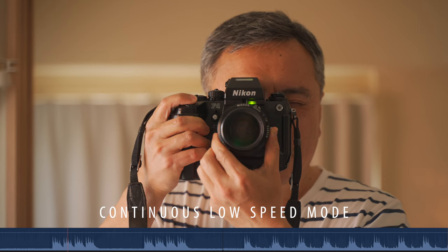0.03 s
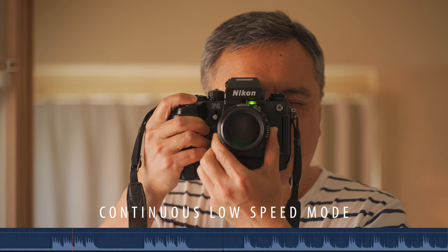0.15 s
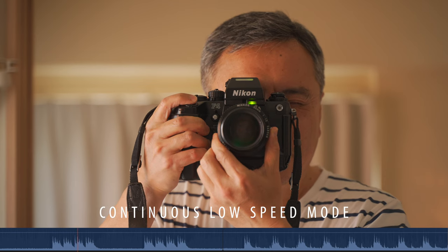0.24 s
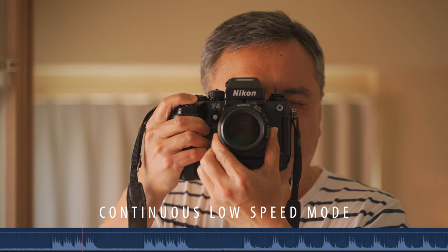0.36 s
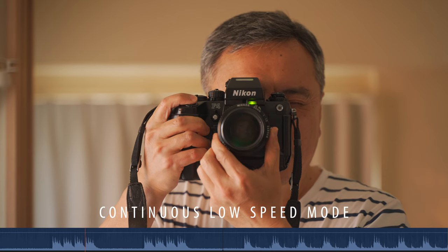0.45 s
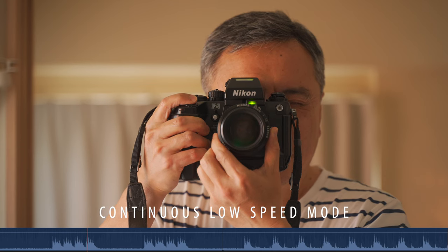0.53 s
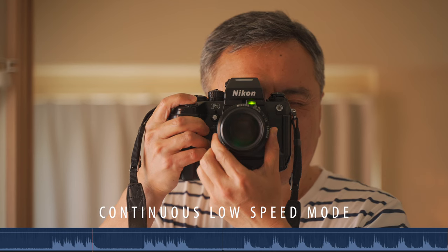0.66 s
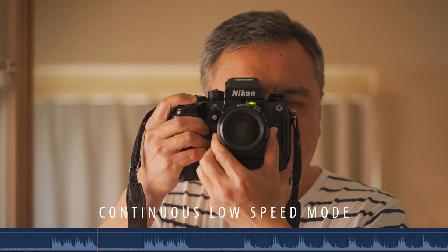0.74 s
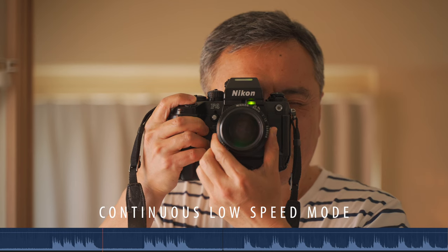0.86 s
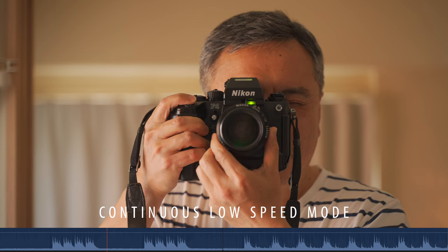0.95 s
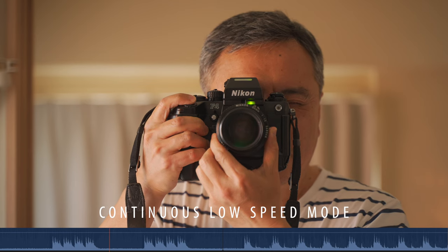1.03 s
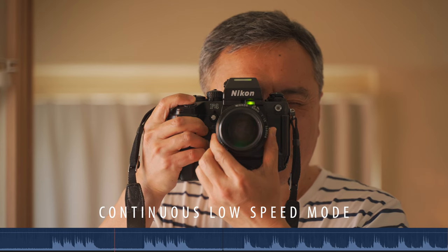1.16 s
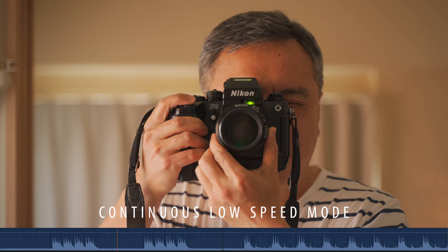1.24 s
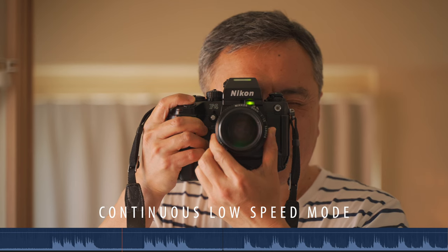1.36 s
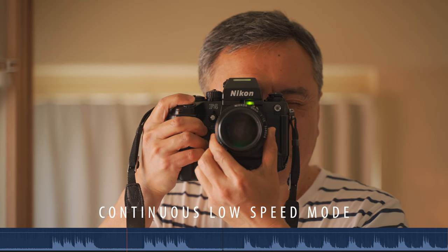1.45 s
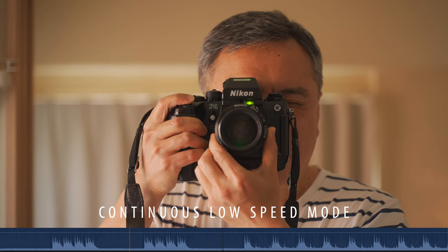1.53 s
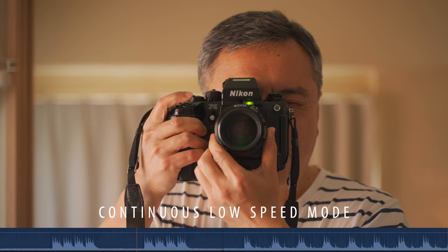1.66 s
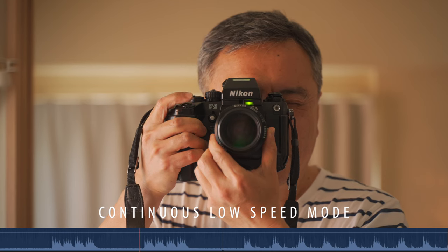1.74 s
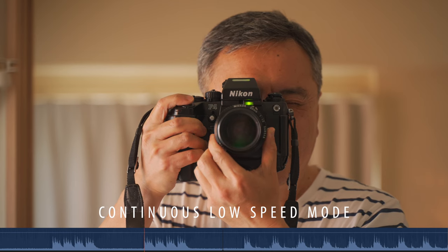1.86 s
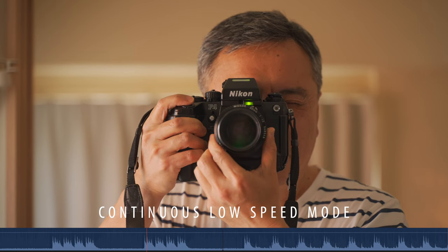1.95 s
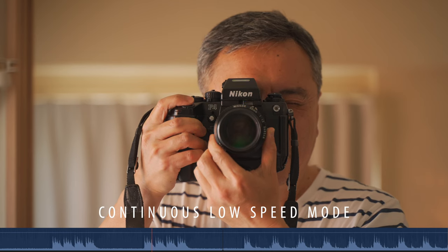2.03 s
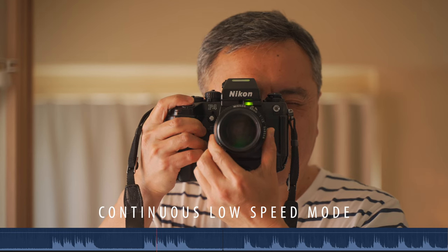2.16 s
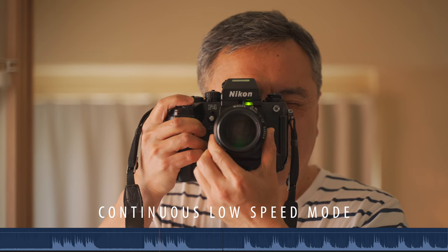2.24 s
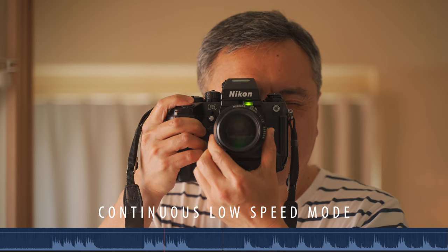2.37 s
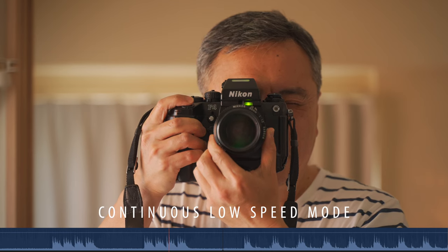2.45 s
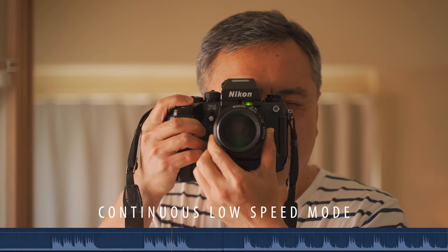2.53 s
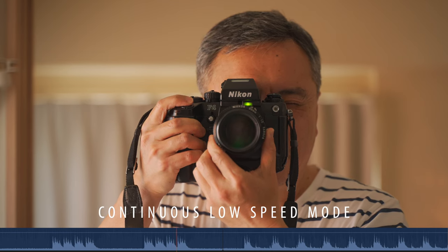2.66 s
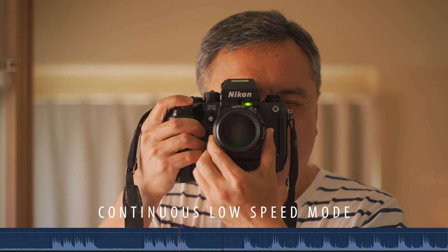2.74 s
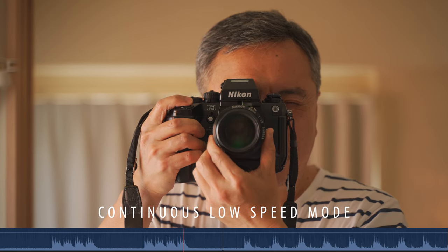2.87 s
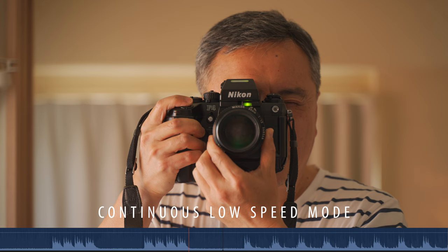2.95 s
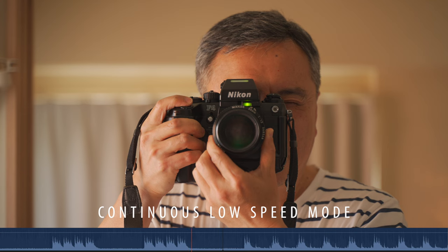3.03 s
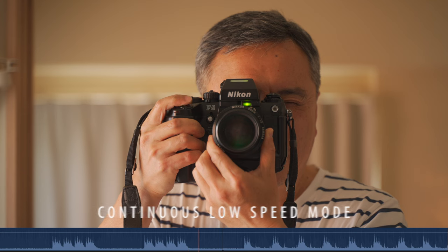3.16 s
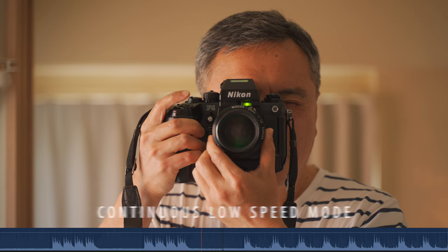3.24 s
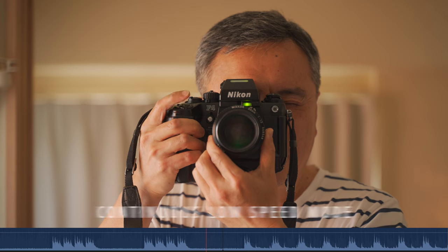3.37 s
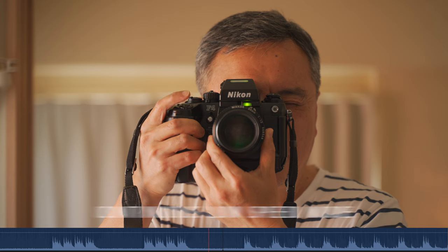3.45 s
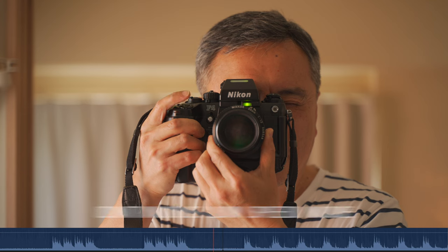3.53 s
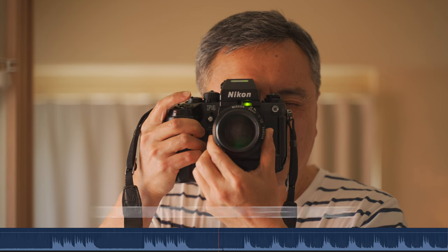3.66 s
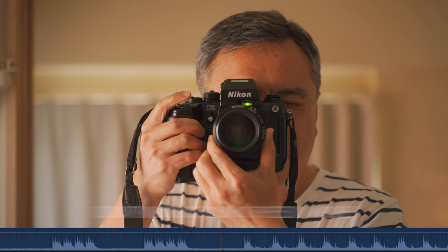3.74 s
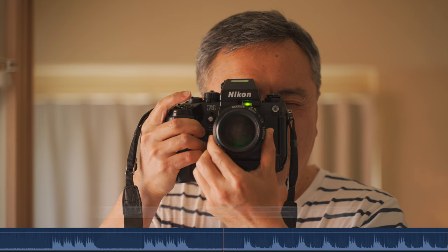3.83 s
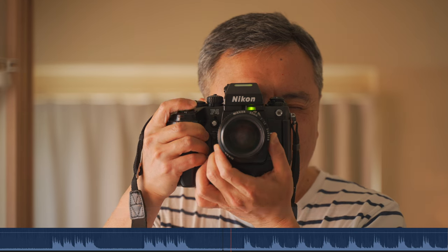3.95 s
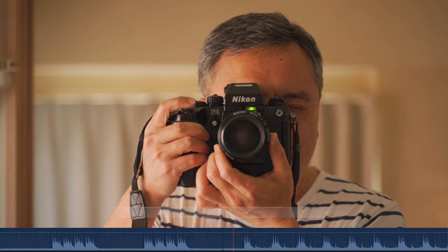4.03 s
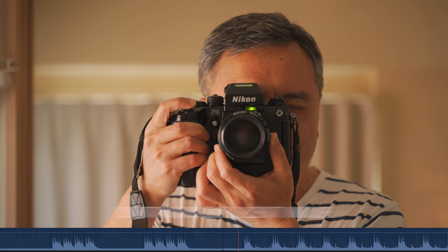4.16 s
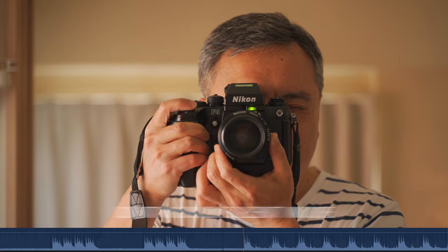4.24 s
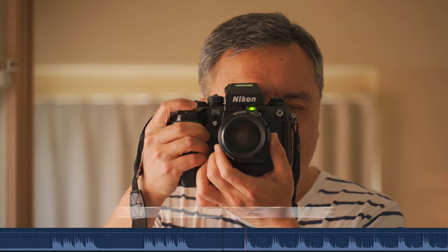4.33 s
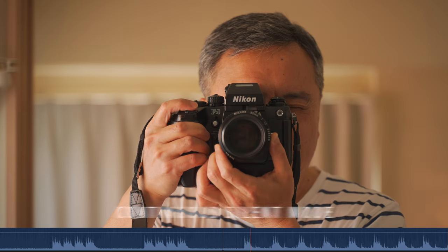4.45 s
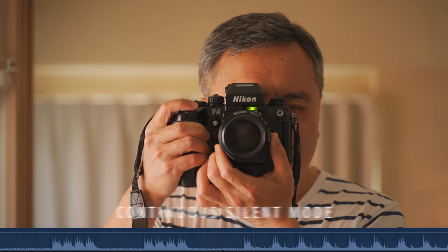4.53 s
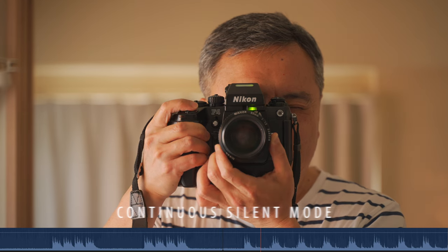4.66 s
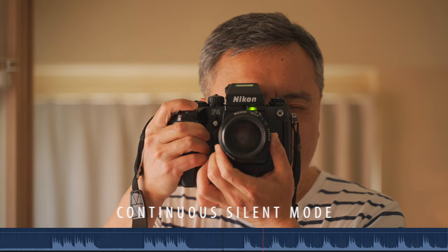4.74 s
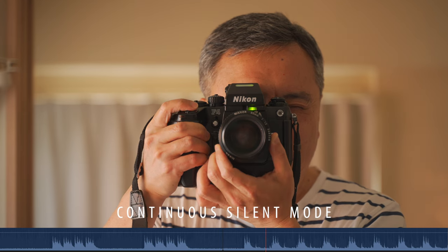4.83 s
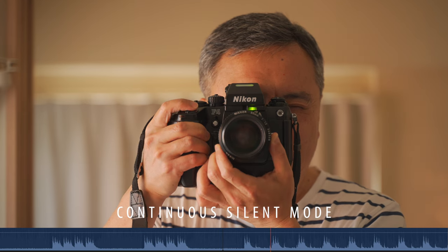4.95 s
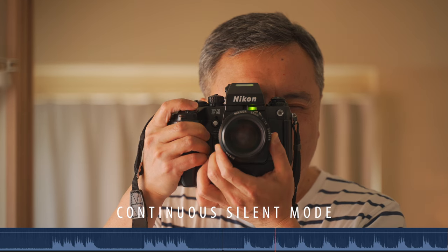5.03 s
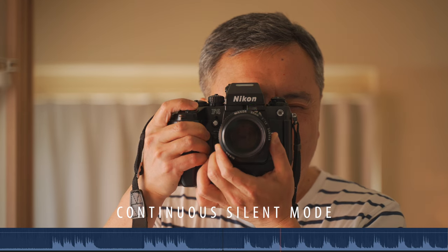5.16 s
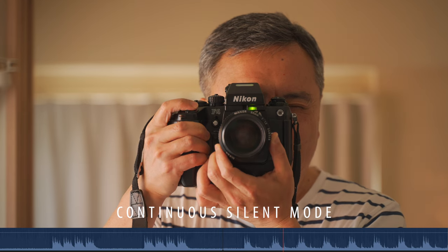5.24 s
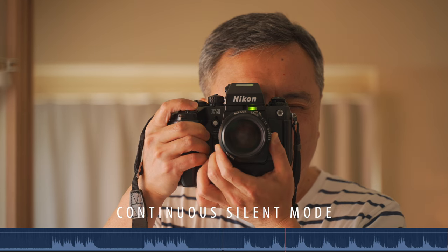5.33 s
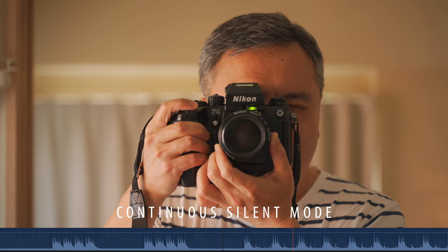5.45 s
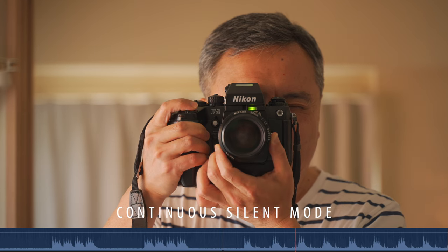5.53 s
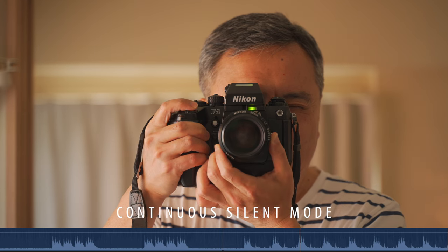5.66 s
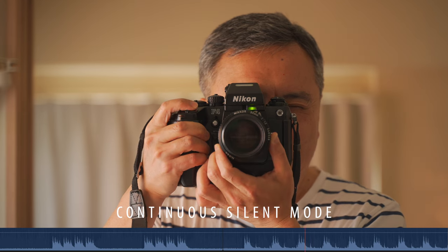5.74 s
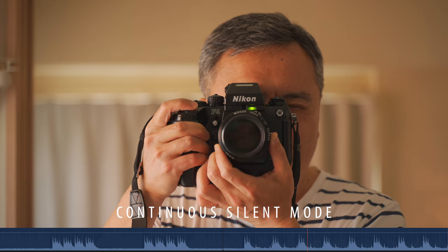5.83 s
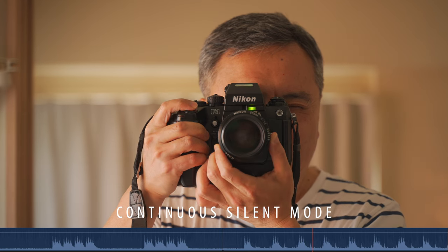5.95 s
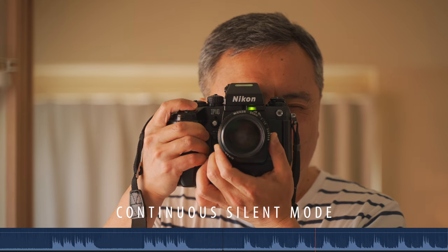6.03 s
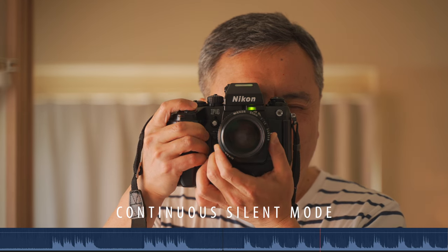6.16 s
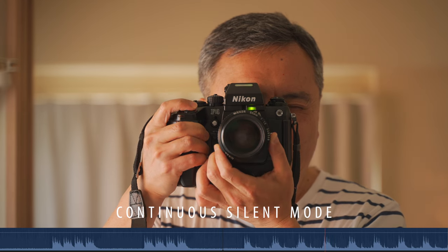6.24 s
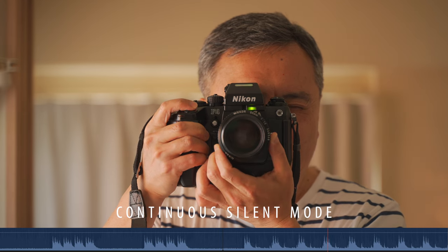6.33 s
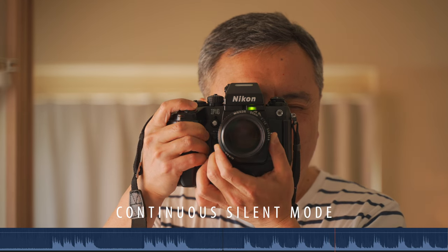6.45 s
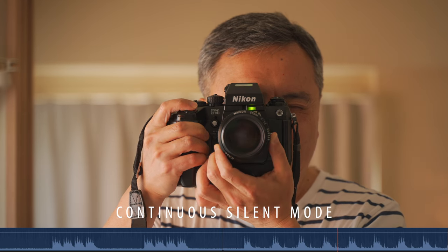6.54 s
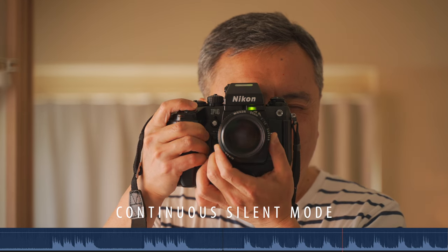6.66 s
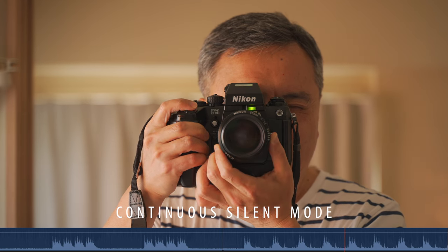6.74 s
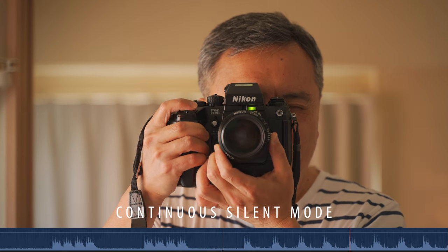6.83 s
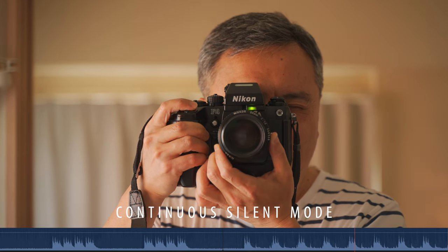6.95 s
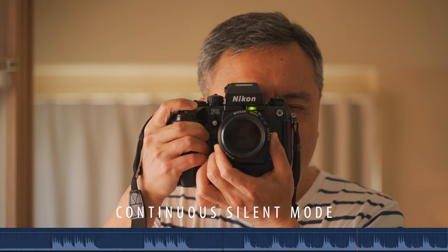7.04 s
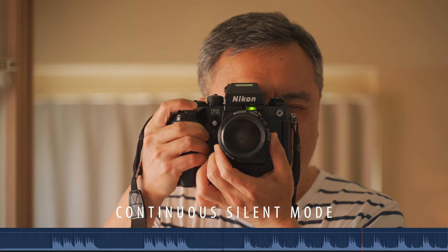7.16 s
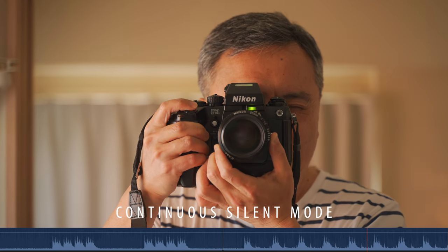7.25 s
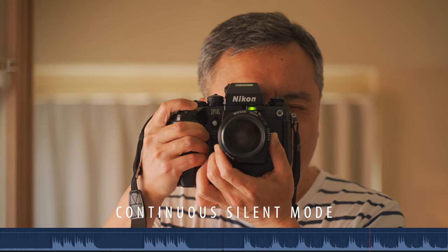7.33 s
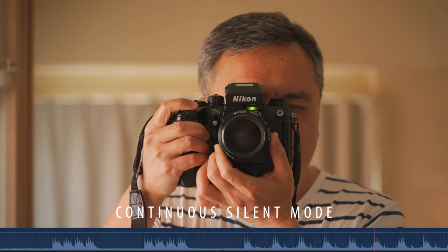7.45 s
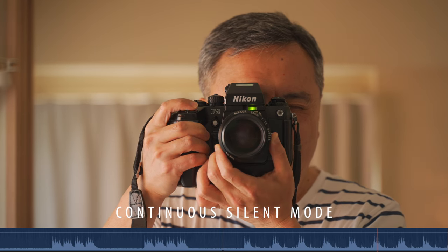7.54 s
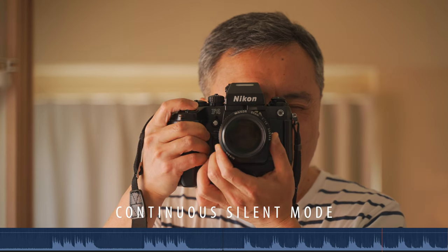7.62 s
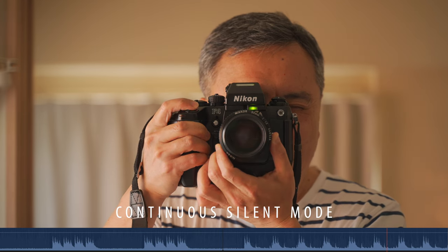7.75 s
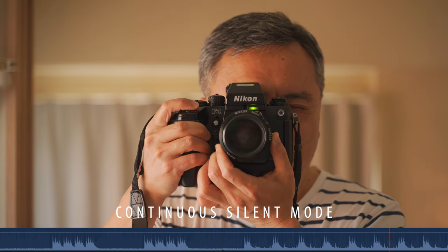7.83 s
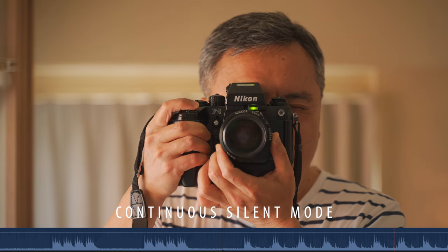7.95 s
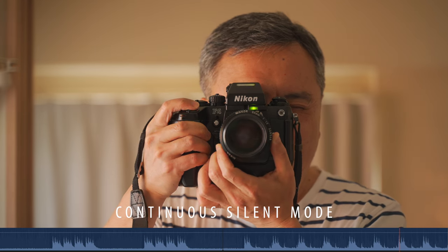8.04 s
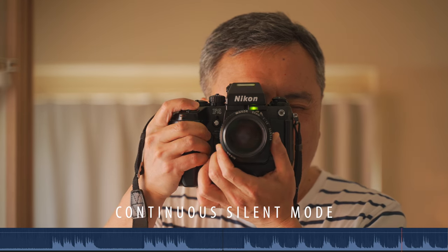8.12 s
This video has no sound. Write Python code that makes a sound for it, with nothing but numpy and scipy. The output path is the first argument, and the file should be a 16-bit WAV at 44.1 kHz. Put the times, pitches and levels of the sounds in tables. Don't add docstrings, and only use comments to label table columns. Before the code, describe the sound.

Rapid four-shot mechanical camera bursts with motor whirr, a pause, then evenly spaced shutter clacks, each trailed by a soft ratcheting creep; faint air hum beneath.

```python
import sys
import numpy as np
from scipy import signal
from scipy.fft import rfft, irfft, next_fast_len
from scipy.io import wavfile
from scipy.ndimage import uniform_filter1d, map_coordinates

SR = 44100
rng = np.random.default_rng(int(sys.argv[2]) if len(sys.argv) > 2 else 0)


def int16_out(signal):
    q = np.round(np.clip(np.atleast_2d(signal).T, -1, 1) * 32767)
    wavfile.write(sys.argv[1], SR, q.astype(np.int16))


def invert_db(level):
    return 10 ** (np.asarray(level, dtype=float) / 20)


N = 361174


def unit(x):
    return x / np.sqrt(np.mean(x ** 2) + 1e-20)


def along(points, hz):
    f, v = np.transpose(points)
    return np.interp(np.log(hz + 1), np.log(f + 1), v)


def wobble(rate):
    knots = rng.standard_normal(int(N * rate / SR) + 4)
    return map_coordinates(knots, [np.arange(N) * rate / SR])


def coloured(x, gain):
    m = 2 * next_fast_len(len(x) // 2 + 2048)
    cepstrum = irfft(np.log(np.maximum(gain(np.fft.rfftfreq(m, 1 / SR)), 1e-6)), m)
    cepstrum[1:m // 2] *= 2
    cepstrum[m // 2 + 1:] = 0
    return irfft(rfft(x, m) * np.exp(rfft(cepstrum)), m)[:len(x)]


def evened(x, width, depth):
    lines = rfft(x)
    size = abs(lines)
    return irfft(lines * (uniform_filter1d(size, size=width) / size) ** depth, x.shape[-1])


def noise(tone):
    return unit(coloured(rng.standard_normal(N), lambda hz: invert_db(along(tone, hz))))


def clacks(events, tone, contacts, alike, gain_db, ring=()):
    size, lead = SR // 6, SR // 50
    out = np.zeros(N + SR)
    habit = rng.standard_normal(size)
    t = (np.arange(size) - lead) / SR
    after = np.maximum(t, 0)
    shape = np.zeros(size)
    for at, db, rise, t60 in contacts:
        onset = np.clip(1 + (t - at) / rise, 0, 1) ** 2
        shape += invert_db(db - 60 * np.maximum(t - at, 0) / t60) * onset
    share = np.clip(alike, 0, 1) ** .4
    for s, db, tilt_db in events:
        fresh = rng.standard_normal(size)
        rattle = shape * (np.sqrt(share) * habit + np.sqrt(1 - share) * fresh)
        rattle = evened(rattle, 300, .6) * np.minimum(20 * shape, 1)
        hit = coloured(rattle, lambda hz: invert_db(along(tone, hz) + tilt_db * np.log2((hz + 100) / 4000)))
        hit /= np.sqrt(np.abs(uniform_filter1d(hit ** 2, size=SR // 400)).max())
        for hz, level_db, t60 in ring:
            t60 = min(t60, .04)
            swing = invert_db(level_db + rng.normal(0, 0.28) - 60 * after / t60) * (1 - np.exp(-after * hz / 2.7))
            hit += swing * np.sin(2 * np.pi * hz * rng.normal(1, 0.003) * after)
        out[round(s * SR):][:size] += invert_db(db + gain_db) * hit
    return out[lead:lead + N]


# (first mirror lift [s], frames [count])
BURSTS = [
    (-.1341, 4),
    (2.0926, 4),
]
BURST_PERIOD_S = .26865
# (mirror lift [s], strength [dB], latch after [s], catch before [s], lever before [s]); 0 = none
QUIET_FRAMES = [(4.5143, -0.5, .2727, 0, 0), (5.2057, 0, .2693, .0777, .0279),
                (5.8354, 0.5, .2746, .0562, .0248), (6.4465, -0.5, .2741, .0387, .016),
                (7.0598, 0, .2949, .045, .0186), (7.6587, 0.3, .2413, .0713, .017)]


def lifts():
    fast = [(s + k * BURST_PERIOD_S, 0, 0) for s, count in BURSTS for k in range(count)]
    return fast + [(s, db, 1) for s, db, *_ in QUIET_FRAMES]


SHUTTER_AFTER_S, STOP_AFTER_S = .0568, .1656
DOWN_AFTER_S = (.103, .1102)
UP_DB, SHUTTER_DB, DOWN_DB = (-10.5, -9.5), (-10.5, -11), (-12.5, -11.5)
STOP_DB, LATCH_DB, CATCH_DB, LEVER_DB = -14, -20, -36.5, -20
UP_TILT_DB, DOWN_TILT_DB = 0.5, (-1.5, -2)
LEVER_TICK = (4.7, -49, 0)


def strokes(part):
    seen = [row for row in lifts() if row[0] > 0]
    levers = [(s - lead, LEVER_DB, 0) for s, *_, lead in QUIET_FRAMES if lead]
    return {"up": [(s, UP_DB[mode] + db, UP_TILT_DB) for s, db, mode in seen],
            "shutter": [(s + SHUTTER_AFTER_S, SHUTTER_DB[mode], 0) for s, db, mode in seen],
            "down": [(s + DOWN_AFTER_S[mode], DOWN_DB[mode], DOWN_TILT_DB[mode]) for s, db, mode in seen],
            "stop": [(s + STOP_AFTER_S, STOP_DB, 0) for s, db, mode in lifts() if not mode],
            "latch": [(s + after, LATCH_DB, 0) for s, db, after, *_ in QUIET_FRAMES],
            "lever": levers + [LEVER_TICK],
            "catch": [(s - lead, CATCH_DB, 0) for s, *_, lead, _ in QUIET_FRAMES if lead]}[part]


# (time [s], hum level [dB], overtone level [dB])
DUCT_HUM = [(0.0, -60, -60), (0.35, -51, -64), (0.9, -58.5, -66), (2.2, -54.5, -67), (2.5, -71, -59),
            (3.6, -52, -62.5), (3.9, -65, -64), (4.06, -49, -54), (4.65, -52.5, -57.5), (5.4, -61.5, -56),
            (6.18, -50.5, -54), (6.5, -58, -63), (7.05, -60, -59), (7.25, -55.5, -57), (8.19, -59, -62)]


def duct_hum():
    times, hum_db, over_db = np.transpose(DUCT_HUM)
    t = np.arange(N) / SR
    hum_db, over_db = np.interp(t, times, hum_db), np.interp(t, times, over_db)

    def turns(hz):
        return np.sin(2 * np.pi * np.cumsum(hz + 1.15 * wobble(8)) / SR)

    hum = invert_db(hum_db - 1.5 + 2.8 * wobble(11)) * turns(100)
    overtone = invert_db(over_db - 2.0 + 2.0 * wobble(8)) * turns(215)
    return hum + overtone


# (frequency [Hz], level [dB])
RUMBLE_TONE = [(11, -43), (20, -17), (30, -9), (39, -17), (52, -2), (65, -6.5), (90, -33), (160, -120)]
# (time [s], level over the rumble [dB])
SWELLS = [(0.52, 3), (1.5, 8), (2.83, 7), (3.42, 4), (3.67, 1), (4.04, 7), (4.8, 5), (5.27, 5), (8.1, 9)]


def building_rumble():
    t = np.arange(N) / SR
    swell_db = sum(db * np.exp(-((t - s) / 0.072) ** 2) for s, db in SWELLS)
    return invert_db(-63 + swell_db) * noise(RUMBLE_TONE)


# (frequency [Hz], level [dB])
AIR_TONE = [(35, -22), (60, -8.5), (107, -4), (182, -8.5), (219, -8.5), (372, -11), (396, -12), (517, -6),
            (752, -14), (893, -15), (1240, -18), (1320, -20), (2500, -32), (3250, -52), (5500, -120)]


def duct_air():
    return invert_db(-51.5 + 0.46 * wobble(5.16)) * noise(AIR_TONE)


# (frequency [Hz], level [dB])
HISS_TONE = [(1470, -19.5), (2500, -3.5), (3360, -7), (4240, -10), (4650, -10), (14400, -12),
             (16000, -10.5)]


def hiss():
    return invert_db(-64.5) * noise(HISS_TONE)


# (frequency [Hz], level [dB])
MOTOR_TONE = [(240, -39), (400, -14), (893, -8), (1490, -4), (2220, -1.5), (2470, -3), (2800, 4.5),
              (3260, -4.5), (5690, -6.5), (6540, -6), (9610, -7.5), (14100, -19), (16000, -28)]


def cocking_motor():
    t = np.arange(N) / SR
    cock, wind, since = np.zeros(N), np.zeros(N), np.zeros(N)
    for (start, *_), (end, *_) in zip(strokes("shutter"), strokes("down")):
        cock += (t > start) & (t < end)
        since[t > start] = t[t > start] - start
    for end, *_ in strokes("stop"):
        wind += (t > end - .062) & (t < end)
    cock, wind = uniform_filter1d(np.array([cock, wind]), size=SR // 200)
    teeth = invert_db(1.2 * wobble(700)) * rng.standard_normal(N)
    whirr = unit(coloured(teeth, lambda hz: invert_db(along(MOTOR_TONE, hz))))
    rotor_level = invert_db(-12 + 3.6 * wobble(40))
    rotor_hz = 1800 + 5200 * np.minimum(since, .11) + 15 * wobble(40)
    rotor = rotor_level * np.sin(2 * np.pi * np.cumsum(rotor_hz) / SR)
    return (invert_db(-31.5) * cock + invert_db(-32.5) * wind) * (whirr + rotor)


# (time after the lift [s], frequency [Hz], level [dB], swell [s])
STRAIN = [(.036, 500, -41, 0.0031), (.085, 518, -44.5, 0.0076)]
# (time after the lift [s], frequency [Hz], level [dB], swell [s])
WIND_STRAIN = [(.170, 520, -36, .014), (.167, 895, -33, .008), (.145, 895, -42, .022)]


def shell():
    t, out = np.arange(N) / SR, np.zeros(N)
    for lift, _, quiet in lifts():
        for at, hz, db, swell in STRAIN + WIND_STRAIN * (1 - quiet):
            s = lift + at
            near = slice(max(round((s - .08) * SR), 0), max(round((s + .08) * SR), 0))
            after = t[near] - s
            out[near] += invert_db(db) * np.exp(-(after / swell) ** 2) * np.sin(2 * np.pi * hz * after)
    return out


# (frequency [Hz], level [dB])
STOP_TONE = [(180, -66), (300, -12), (440, -26), (870, -6.5), (1340, -2.5), (1560, -9), (2360, 1),
             (3130, -3.5), (4910, -5), (5700, -6.5), (6620, -1), (10000, -8), (14000, -19), (16000, -25)]
# (frequency [Hz], level [dB], t60 [s])
STOP_RING = [(1620, -12, 0.048), (2290, -2, 0.035), (4840, -4, 0.023), (6080, -8, .04)]


def film_stop():
    contacts = [(-.003, -0.5, 0.0018, 0.13), (.002, 4.5, 0.002, 0.058), (.017, -40, .002, 0.084)]
    return clacks(strokes("stop"), STOP_TONE, contacts, alike=0.26, gain_db=-8.5, ring=STOP_RING)


# (frequency [Hz], level [dB])
UP_TONE = [(240, -47), (400, -18.5), (740, -10.5), (900, -2.5), (1140, -5.5), (2710, 2), (4180, -6),
           (4650, -0.5), (5780, -5), (6240, 2), (9040, -2.5), (13500, -9), (15000, -30), (16000, -11)]
# (frequency [Hz], level [dB], t60 [s])
UP_RING = [(884, -17.5, 0.031), (1267, -12.5, 0.043), (1590, -16, 0.044), (2820, 8, 0.014), (3636, -9, .04),
           (6450, -9, 0.035), (8990, -0.5, 0.02)]


def mirror_up():
    contacts = [(-.001, -15, 0.0028, .05), (.0018, 3.5, 0.0014, 0.015), (.007, -6.5, .002, 0.13)]
    return clacks(strokes("up"), UP_TONE, contacts, alike=0.78, gain_db=-7.5, ring=UP_RING)


# (frequency [Hz], level [dB])
SHUTTER_TONE = [(240, -37.5), (450, -13), (800, -10), (1100, -6.5), (1600, -10.5), (2020, -3.5), (3400, -7),
                (4380, -2), (5250, -2.5), (6950, -3.5), (8760, -4.5), (11200, -8), (13300, -14),
                (16000, -18)]
# (frequency [Hz], level [dB], t60 [s])
SHUTTER_RING = [(888, -10, 0.03), (1980, -7, 0.03), (2390, -9, .04), (3900, -7, .03), (4300, 1, 0.035),
                (4520, 0, .035), (8670, -5, .03)]


def shutter():
    contacts = [(-.002, 3, 0.0073, 0.042), (.003, 6, 0.0038, 0.03), (.009, -11, .002, 0.035)]
    return clacks(strokes("shutter"), SHUTTER_TONE, contacts, alike=0.76, gain_db=-8.5, ring=SHUTTER_RING)


# (frequency [Hz], level [dB])
DOWN_TONE = [(240, -45.5), (400, -28), (1040, -19.5), (1630, -13.5), (2360, -15), (2750, -1), (3530, -10),
             (4440, -11.5), (5030, -18), (6240, -7.5), (6850, -11.5), (10400, -10), (14800, -20.5),
             (16000, -39)]
# (frequency [Hz], level [dB], t60 [s])
DOWN_RING = [(1607, -2, 0.11), (2794, 8, 0.022), (2900, 1, 0.023), (3190, -5, 0.017), (8100, -10, 0.029),
             (9800, -7, 0.048)]


def mirror_down():
    contacts = [(.001, -4, 0.0014, 0.039), (.009, -14.5, .001, 0.03), (.0175, -12.5, .001, 0.02),
                (.024, -14, 0.0012, 0.035)]
    return clacks(strokes("down"), DOWN_TONE, contacts, alike=0.37, gain_db=-9.0, ring=DOWN_RING)


# (frequency [Hz], level [dB], t60 [s])
SPRING = [(4393, -71, 3), (10977, -74, 2.2)]


def spring():
    after = np.maximum(np.arange(N) / SR - .84, 0)
    return sum(invert_db(db - 60 * after / t60) * np.sin(2 * np.pi * hz * after) for hz, db, t60 in SPRING)


# (frequency [Hz], level [dB])
SPROCKET_TONE = [(710, -16.5), (1200, -4), (2000, 1), (2590, 3.5), (4960, -7.5), (6510, -4.5), (8080, -19),
                 (9720, -14), (16000, -33)]
# (time [s], level [dB])
SPROCKET = [(1.075, -54), (4.0075, -49.5), (4.8564, -31.5), (4.889, -38), (4.984, -34.5), (5.062, -45),
            (5.51, -34.5), (5.561, -35), (5.668, -32), (5.724, -37), (6.198, -32), (6.342, -33.5),
            (6.395, -32), (6.777, -32.5), (6.838, -44), (6.9486, -33), (6.997, -32), (7.342, -32),
            (7.395, -32.5), (7.443, -33), (7.519, -32), (7.5811, -30), (7.9754, -32), (8.0692, -45),
            (8.1262, -31.5)]


def sprocket():
    contacts = [(.001, 11.3, 0.0013, 0.043), (.008, 4, 0.0022, .04), (.017, 3.4, 0.003, 0.042)]
    jerks = [(s, db, 1) for s, db in SPROCKET]
    return clacks(jerks, SPROCKET_TONE, contacts, alike=0.0085, gain_db=-11.0)


# (time [s], level [dB])
FINGERTIP = [
    (3.287, -56),
]


def fingertip():
    tone = [(6000, -30), (8000, 0), (10000, -30)]
    touches = [(s, db, 0) for s, db in FINGERTIP]
    return clacks(touches, tone, [(0.0084, 0, .001, .03)], alike=0, gain_db=-2.5)


# (frequency [Hz], level [dB], t60 [s])
BRAKE_RING = [(5370, 7, 0.035), (8560, 6, 0.03), (6770, 2, .03)]


def shutter_brake():
    runs = strokes("shutter")[-len(QUIET_FRAMES):]
    rub = [(.003, 0, 0.0024, 0.013)]
    return clacks(runs, SHUTTER_TONE, rub, alike=0.31, gain_db=-16.5, ring=BRAKE_RING)


# (frequency [Hz], level [dB])
CREEP_TONE = [(600, -20), (1000, 1), (1400, -7), (2000, -4), (2500, 4), (3400, -8.5), (4500, -7.5),
              (5400, -14), (6500, -5), (7600, -12), (12000, -15), (16000, -28)]


def slow_winder(ticks):
    t = np.arange(N) / SR
    starts = np.array([s for s, *_ in QUIET_FRAMES]) + 0.094
    since = t - starts[np.maximum(np.searchsorted(starts, t) - 1, 0)]
    effort_db = -52 + uniform_filter1d(12.5 * np.exp(-abs(since) / 0.061), size=SR // 50)
    grain_db = np.minimum(3 * wobble(40) + 5 * wobble(330), 12)
    jolts = np.bincount([round(s * SR) for s, db in ticks], minlength=N)[:N] * invert_db(9)
    jolts = 1 + signal.fftconvolve(jolts, invert_db(-60 * t[:SR // 10] / .04))[:N]
    return (since > 0) * invert_db(effort_db - 11 + grain_db) * jolts * noise(CREEP_TONE)


# (frequency [Hz], level [dB])
RELEASE_TONE = [(240, -29), (400, -3), (893, -5), (1840, -5.5), (2840, 1), (3160, -7), (5600, -3),
                (6540, -3.5), (10100, -5), (14400, -22), (16000, -35)]


def release_lever():
    snap = [(.0006, 2, .0005, .018), (.005, -8, .002, .07)]
    modes = [(530, -6.5, 0.059), (2827, -1.0, 0.053)]
    return clacks(strokes("lever"), RELEASE_TONE, snap, alike=0.16, gain_db=-6.0, ring=modes)


# (time [s], level [dB])
TRIPS = [(4.7641, -42), (5.4405, -43), (6.0916, -41), (6.2522, -48), (6.7012, -39), (7.335, -44),
         (7.885, -42)]
# (time [s], second drop after [ms], third drop after [ms]); 0 = none
LOADED_TEETH = [(4.8656, 5.3, 11.6), (4.9135, 26.3, 0), (4.9778, 6.1, 0), (5.0238, 4.1, 0),
                (5.0578, 5.1, 27), (5.1217, 0, 0), (5.5512, 4, 13.7), (5.59, 0, 0), (5.6301, 28.1, 0),
                (5.7021, 14.9, 22), (5.7674, 5.6, 0), (6.1858, 10, 17.6), (6.2321, 22.3, 0),
                (6.2884, 5.1, 0), (6.3373, 6.2, 0), (6.3854, 7, 0), (6.7918, 4.1, 0), (6.8318, 5.2, 0),
                (6.8742, 15.5, 19.5), (6.9346, 5.2, 12), (6.9902, 7.5, 0), (7.4361, 8, 0), (7.4769, 0, 0),
                (7.5121, 0, 0), (7.5623, 10.7, 16.7), (7.9554, 7, 16), (8.0062, 12.2, 0), (8.0611, 4.3, 0),
                (8.105, 12.4, 19.3), (8.168, 5.4, 12.2)]


def drops():
    spread_db = 0
    latches = strokes("latch")
    luck = rng.random((len(latches) * 3, 2))
    slack = []
    for (latch_s, *_), (shift, chatter) in zip(latches, luck):
        first = min(s for s, *_ in LOADED_TEETH if s > latch_s)
        slack.append((first - 0.051 + 0.0084 * (shift - .5), 12 * (chatter + .3), 0))
    rows = []
    for s, *later in slack + LOADED_TEETH:
        rows.append((s, -45))
        rows += [(s + ms / 1000, -46 if ms < 15 else -45) for ms in later if ms]
    uneven = spread_db * rng.standard_normal(len(rows))
    return TRIPS + [(s, db + more) for (s, db), more in zip(rows, uneven)]


def pawl(ticks, ring_hz, t60, gain_db):
    t, out = np.arange(SR // 20) / SR, np.zeros(N + SR)
    for s, db in ticks:
        main, low, high = 2 * np.pi * ring_hz * rng.normal([1, .92, 1.06], [.012, .02, .015])
        modes = np.sin(main * t) + .25 * np.sin(low * t) - .55 * np.sin(high * t)
        out[round(s * SR):][:len(t)] += invert_db(db + gain_db - 60 * t / t60) * (1 - np.exp(-t / 0.00017)) * modes
    return out[:N]


# (frequency [Hz], level [dB])
LATCH_TONE = [(600, -34), (1000, -10), (2500, -9), (3900, -11), (5000, 0.5), (6200, -1), (7800, -9.5),
              (10500, -2), (12000, -3.5), (13500, -12.5), (15100, -14), (16000, -20)]


def latch():
    contacts = [(.0005, 3.5, 0.00031, 0.022), (.006, -12.5, 0.0012, 0.091)]
    return clacks(strokes("latch"), LATCH_TONE, contacts, alike=0.13, gain_db=-10.0)


# (frequency [Hz], level [dB])
CATCH_TONE = [(590, -16), (1000, -7.5), (1910, -9), (2200, -3.5), (4020, -3), (7100, -14), (9170, -7),
              (12300, -22), (14600, -20), (16000, -27.5)]


def catch():
    contacts = [(.0005, 9.4, 0.0028, 0.029), (.0035, 1, 0.00069, 0.097)]
    return clacks(strokes("catch"), CATCH_TONE, contacts, alike=0.28, gain_db=1.5)


def distant_knock():
    after = np.maximum(np.arange(N) / SR - 5.35, 0)
    return invert_db(-33 - 60 * after / .1) * (1 - np.exp(-after / 0.013)) * np.sin(2 * np.pi * 200 * after)


def gear_song():
    start_s, end_s, fade_db_per_s = 6.65, 7.0, 20
    t = np.arange(N) / SR
    gate = np.clip((t - start_s) / 0.016, 0, 1) * np.clip((end_s - t) / .03, 0, 1)
    level = invert_db(-52 - fade_db_per_s * (t - start_s))
    return gate * level * np.sin(2 * np.pi * np.cumsum(1055 + 6 * wobble(26)) / SR)


# (frequency [Hz], t60 [s])
ROOM_T60 = [(300, 0.58), (1000, 0.49), (3000, 0.86), (8000, 0.71), (15000, 0.54)]
# (frequency [Hz], level [dB])
WALLS = [(300, 5), (2200, 0), (2550, -3), (2800, -8), (3100, -3), (3500, -0.5), (9000, -1.5), (9750, -4),
         (16000, -4.5)]


def room(x, wet_db, gap):
    hz, t, z = signal.stft(rng.standard_normal(SR // 2), SR, nperseg=256)
    tail = signal.istft(z * invert_db(-60 * t / along(ROOM_T60, hz)[:, None]), SR, nperseg=256)[1]
    t = np.arange(len(tail)) / SR
    absorbed = invert_db(-30 * t / .55)
    tail = evened(tail * absorbed, 150, .8) * absorbed * np.clip(t / gap, 0, 1)
    wet = signal.fftconvolve(x, tail / np.linalg.norm(tail))[:N]
    return invert_db(wet_db) * coloured(wet, lambda hz: invert_db(along(WALLS, hz)))


def scene():
    teeth = drops()
    frame = mirror_up() + shutter() + mirror_down() + film_stop() + release_lever() + shutter_brake()
    motor = cocking_motor()
    winder = slow_winder(teeth) + latch() + catch() + sprocket() + gear_song()
    camera = frame + motor + winder
    ticks = pawl(teeth, ring_hz=9690, t60=0.012, gain_db=3.0)
    walls = room(camera + invert_db(-1.0) * ticks, wet_db=-4, gap=0.0019)
    body = shell() + fingertip() + spring()
    background = duct_hum() + building_rumble() + distant_knock() + duct_air() + hiss()
    return (camera + ticks + walls + body + background)[None]


def band_limit(x):
    return signal.sosfilt(signal.butter(12, 15780, fs=SR, output="sos"), x)


def record(dry):
    limited = coloured(dry[0], lambda hz: 1 / (1 + (hz / 16050) ** 120))
    return band_limit(limited[None])


dry = scene()
out = record(dry)
int16_out(out)
```